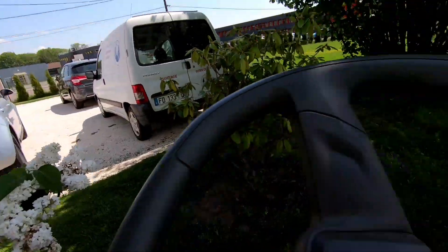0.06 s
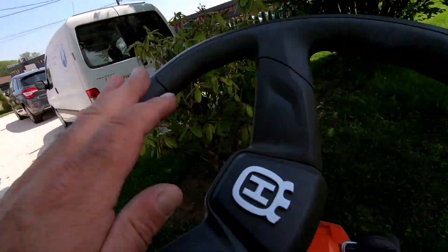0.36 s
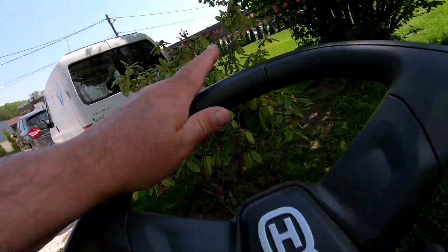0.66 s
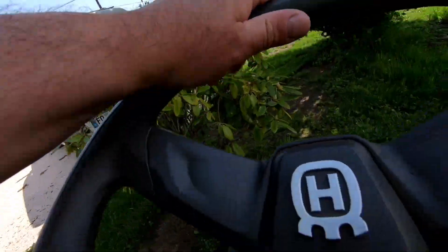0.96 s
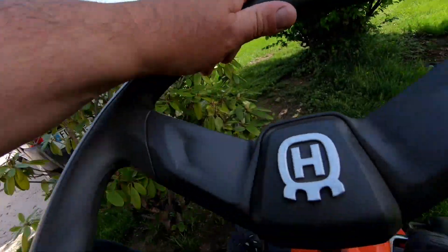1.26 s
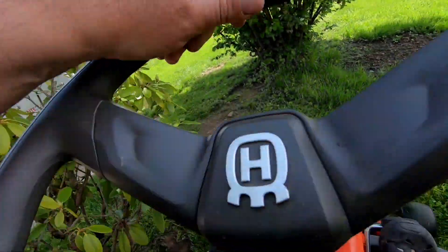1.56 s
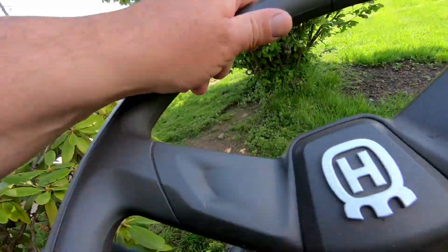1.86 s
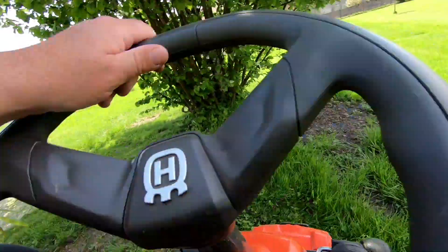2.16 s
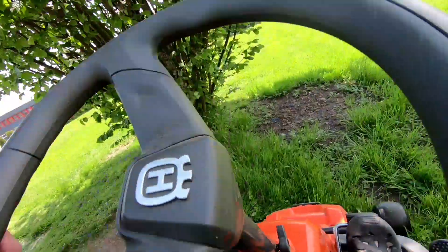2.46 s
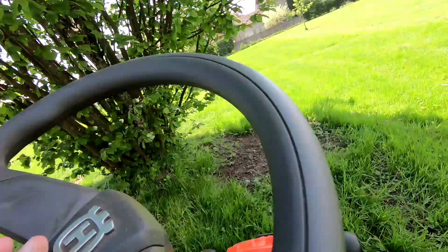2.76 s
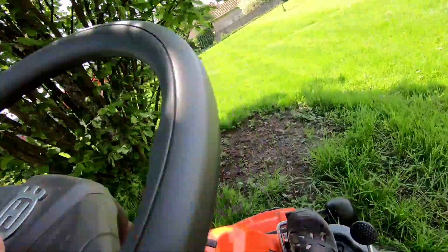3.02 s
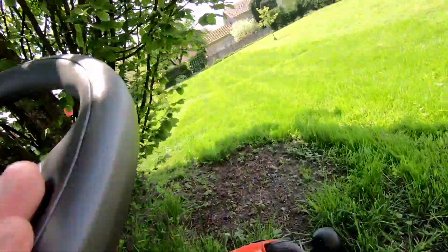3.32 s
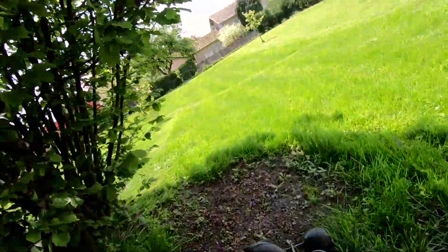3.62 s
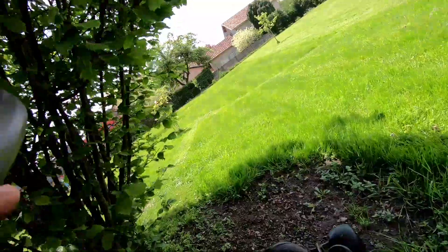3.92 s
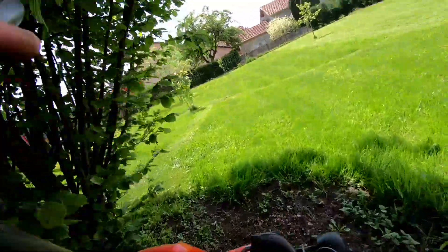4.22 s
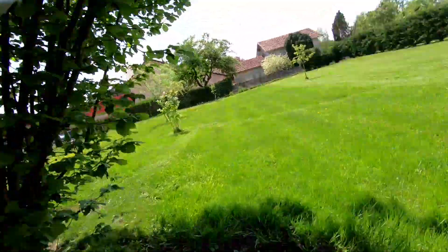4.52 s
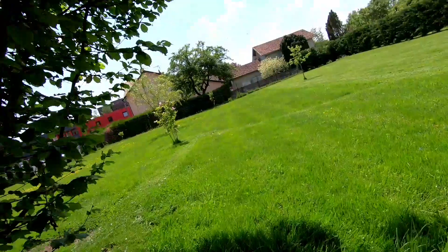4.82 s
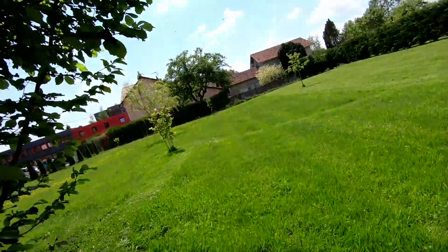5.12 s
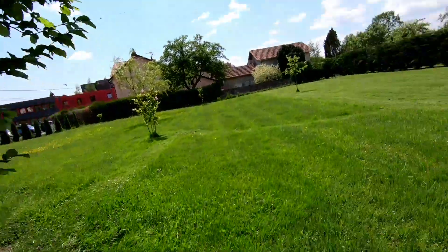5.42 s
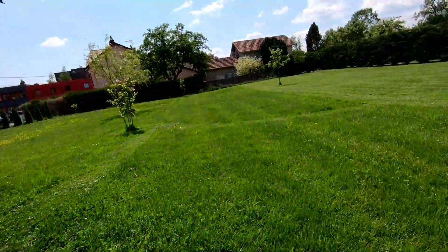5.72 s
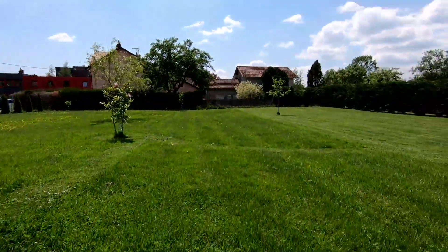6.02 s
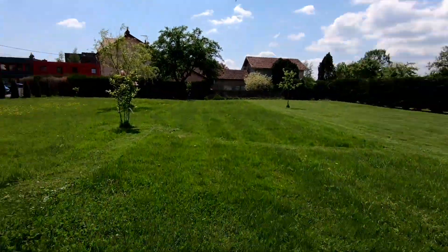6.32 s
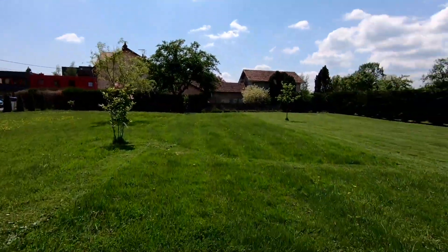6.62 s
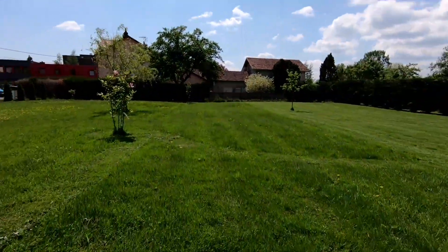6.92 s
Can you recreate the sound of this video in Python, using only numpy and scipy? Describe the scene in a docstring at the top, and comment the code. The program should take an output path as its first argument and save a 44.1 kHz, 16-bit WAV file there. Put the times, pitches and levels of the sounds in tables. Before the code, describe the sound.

A ride-on lawn mower runs steadily, heard close from the driver's seat outdoors. Its engine drone and blade hum throb together over a rush of air and cut grass. At first the machine hisses and squeaks thinly, and loose panels buzz and knock. Midway the grass rush grows heavier while the sound dulls and narrows, then the brightness and width return. A light breeze touches the microphone.

```python
"""Ride-on mower from the driver's seat

A single-cylinder four-stroke drones under a governor; two belt-driven blades hum just below its fifth
order, so the drone throbs. Air and cut grass rush in the deck; the running gear hisses, squeaks and
rings thinly, and loose panels buzz and knock. A light breeze touches the microphones.
Midway the sound narrows to mono and dulls, then opens again."""
import sys
import numpy as np
from scipy import signal
from scipy.fft import rfft, irfft, next_fast_len
from scipy.io import wavfile
from scipy.ndimage import uniform_filter1d

SR = 44100
rng = np.random.default_rng(int(sys.argv[2]) if len(sys.argv) > 2 else 0)


def wav_out(sig):
    """Save sig, one row per channel (or a flat mono array), as 16-bit PCM at SR to the path in sys.argv[1]."""
    wavfile.write(sys.argv[1], SR, np.round(np.clip(np.atleast_2d(sig).T, -1, 1) * 32767).astype(np.int16))


N = 312113
FFT_SIZE = next_fast_len(N, True)
BINS = np.fft.rfftfreq(FFT_SIZE, 1 / SR)


def undb(db):
    """Decibels to gain."""
    return np.exp(np.asarray(db) * (np.log(10) / 20))


def unit(x):
    """Scale to an rms of 1."""
    return x / np.sqrt(np.mean(x ** 2))


def curves(table):
    """Each column of a timed table as an automation curve."""
    times, *columns = np.transpose(table)
    return [np.interp(np.arange(N) / SR, times, column) for column in columns]


def spectrum(table):
    """A table over log frequency, read at every FFT bin."""
    hz, value = np.transpose(table)
    return np.interp(np.log(BINS + 1), np.log(hz), value)


def resonances(table):
    """Gain per FFT bin of a few damped modes."""
    return sum(undb(db) / np.sqrt(width) / (1 + ((BINS - hz) / width) ** 2) for hz, width, db in table)


def drift(rate):
    """Smooth random modulation with an rms of 1 and about rate turns a second."""
    step = max(int(SR / rate / 8), 1)
    coarse = signal.lfilter(np.hanning(9), 1, rng.standard_normal(N // step + 20))[10:]
    return unit(np.interp(np.arange(N) / step, np.arange(len(coarse)), coarse))


def arch(middle_s, length_s):
    """The samples that a swell covers, and its rise and fall."""
    start, end = int((middle_s - length_s / 2) * SR), int((middle_s + length_s / 2) * SR)
    span = np.arange(max(start, 0), min(end, N))
    return span, np.cos(np.pi * (span / SR - middle_s) / length_s)


def swells(table, floor_db):
    """Gain of a bed with smooth swells on top."""
    power = np.full(N, undb(floor_db) ** 2)
    for s, length, db in table:
        span, shape = arch(s, length)
        power[span] += (undb(db) * shape) ** 2
    return np.sqrt(power)


# which microphone the sound reaches first: (frequency [Hz], share of the side leading left [-1 to 1])
MIC_LEAD = [(300, -0.12), (860, -0.72), (1550, 0.69), (2200, 0.41), (3600, 0.31), (4400, 0), (14000, 0)]
# stereo width: (frequency [Hz], side minus mid [dB])
WIDTH = [(30, -3), (100, -7), (250, -26.5), (450, -9), (700, -3.5), (1260, -1), (2300, 2.5), (4300, -2.5),
         (6300, 8), (8000, 5.5), (10000, 3.5), (14500, 1)]
# pan, to the right above the lows: (frequency [Hz], left minus right [dB])
PAN = [(350, 3), (690, -5.5), (1260, -8), (2300, -1.5), (4300, -1.5), (7900, -2), (14000, -1)]
def at_mics(pair, eq=np.ones(len(BINS))):
    """Colour a direct and a diffuse signal and spread them to left and right."""
    mid, diffuse = rfft(pair, FFT_SIZE) * unit(eq)
    lead = np.clip(spectrum(MIC_LEAD), -1, 1)
    side = (1j * lead * mid + np.sqrt(1 - lead ** 2) * diffuse) * undb(spectrum(WIDTH))
    pan = undb(spectrum(PAN) / 2)
    return irfft(np.array([(mid + side) * pan, (mid - side) / pan]), FFT_SIZE)[:, :N]


def pulsed_noise(eq, pulse_db):
    """Stereo noise, modulated by pulse_db and coloured by eq."""
    return at_mics(rng.standard_normal((2, N)) * unit(undb(pulse_db)), eq)


# engine speed: (time [s], firing rate [Hz])
ENGINE_SPEED = [(0, 25.8), (.3, 25.458), (1.29, 25.164), (2.885, 25.242), (3.503, 24.611), (4.126, 24.946),
                (5.125, 25.855), (5.741, 24.926), (6.123, 24.508), (6.9, 24.505), (7.08, 24.795)]
def engine_cycles():
    """Running count of firings as the speed sags and recovers under the governor."""
    return np.cumsum(curves(ENGINE_SPEED)[0]) / SR


# core of the drone: (order [x firing rate], level [dB], gain with load [dB/dB])
MAIN_ORDERS = [(5, -38.5, 0.45), (6, -47, 0.66)]
# the eleventh order swells and fades: (time [s], level [dB])
ELEVENTH_ORDER = [(0, -47.5), (1.4, -44.5), (1.9, -47.5), (2.3, -44.5), (3, -46.5), (3.42, -40.5),
                  (3.72, -42.5), (3.87, -49), (4.05, -45.5), (4.3, -52), (4.7, -46.5), (5.1, -48.5),
                  (5.3, -46), (5.9, -52.5), (6.3, -46.5), (6.65, -43), (7.08, -48)]
# body of the drone: (order [x firing rate], level before trim [dB])
BODY_ORDERS = [(1, -64.5), (2, -51), (3, -53), (4, -63.5), (7, -58.5), (8, -58), (9, -66.5), (10, -53),
               (12, -64), (13, -54.5), (14, -53), (15, -65.5), (16, -60), (18, -63), (20, -66.5), (27, -65),
               (28, -67), (32, -63.5)]
def exhaust(cycle, load_db, jitter_turns=.0017, smear_turns=.04, waver_db=1.45, trim_db=-.5):
    """Harmonics of the firings; the silencer smears each pulse and no two burns are quite alike."""
    uneven = cycle + jitter_turns * drift(11)
    orders = [(k, db + follow * load_db - .23 * drift(.88)) for k, db, follow in MAIN_ORDERS]
    orders += [(11, curves(ELEVENTH_ORDER)[0])]
    orders += [(k, db + trim_db + waver_db * drift(5.7)) for k, db in BODY_ORDERS]
    tones = (undb(db) * np.cos(2 * np.pi * (k * uneven - smear_turns * k * k)) for k, db in orders)
    return np.sqrt(2) * sum(tones)


def rattle(cycle, size=2048, loose_turns=.0009, uneven_db=1.5):
    """Valves, piston and gas repeat the same rattle in each engine cycle, a little loose in time."""
    place = ((cycle + loose_turns * drift(12)) * size).astype(int) % size
    return rng.standard_normal((2, size))[:, place] * undb(uneven_db * drift(40))


# midrange honk of the bonnet: (frequency [Hz], relative level [dB])
BONNET_EQ = [(350, -7.5), (480, -11.5), (700, -1), (950, 7.5), (1250, 9), (1500, -3), (1920, -2),
             (2300, -1), (3200, -11.5), (5000, -35.5)]
def clatter(cycle, rumble_db, trim_db=-10.5):
    """The engine's rattle as it comes through the bonnet."""
    return unit(at_mics(rattle(cycle), undb(spectrum(BONNET_EQ)))) * undb(rumble_db + trim_db)


# first blade's tips passing the deck wall; the belt slips under load: (time [s], pass rate [Hz])
BLADE_SPEED = [(0, 118.3), (.414, 116.57), (1.25, 115.6), (1.7, 115.95), (2.898, 115.74), (3.308, 112.08),
               (4.218, 113.15), (4.78, 116.76), (4.895, 118.62), (5.449, 116.65), (5.931, 111.61),
               (6.19, 111.33), (7.08, 111.53)]
# the second blade creeps ahead and falls back on the belt: (time [s], lead [passes])
BLADE_LEAD = [(0, 0.11), (.12, 0.21), (.45, -0.0057), (.9, .17), (1.12, 0.1), (1.45, 0.18), (1.97, 0.44),
              (2.2, 0.34), (2.4, 0.21), (2.62, 0.18), (3.22, 0.047), (3.42, 0.5), (3.55, 0.33),
              (3.68, 0.16), (3.8, 0.15), (3.94, 0.21), (4.05, 0.32), (4.53, 0.59), (5.07, -0.076),
              (5.23, 0.17), (5.32, 0.0025), (5.6, 0.32), (5.95, 0.31), (6.27, 0.14), (6.43, 0.32),
              (6.63, 0.21), (7.08, 0.47)]
# hum of the first blade: (harmonic [x pass rate], level [dB], gain with load [dB/dB])
BLADE_HUM = [(1, -40.5, 0.3), (2, -39.5, 0.6), (3, -50.5, 0)]
# booms on the third harmonic: (centre [s], length [s], level [dB])
DECK_BOOMS = [(1.3, .6, -45), (3.33, .16, -45.5), (3.92, 0.17, -36.5), (4.13, 0.2, -37), (4.53, .2, -45),
              (4.88, .5, -42.5), (5.56, .2, -42), (6.17, .3, -47)]
# overtones at top speed: (harmonic [x pass rate], level relative to the rumble fader [dB])
BLADE_OVERTONES = [(4, -4.5), (5, -9.5), (6, -16.5), (7, -18.5), (8, -21)]
def blades(rumble_db, load_db, second_db=-3, skew_turns=.13, flutter_db=.4, db_per_hz=.68):
    """Two blades hum; as they drift in and out of step, their harmonics swell and cancel."""
    speed, ahead = curves(BLADE_SPEED)[0], curves(BLADE_LEAD)[0]
    passes = .095 + np.cumsum(speed) / SR
    out = 0
    for k, db, follow in BLADE_HUM:
        # each harmonic leads the one below by about a quarter turn: a steep front, a slow release
        first = k * passes + (k - 1) * (.25 + .028 * drift(4.2))
        second = first + k * ahead + (k - 1) * skew_turns
        pair = np.cos(2 * np.pi * first) + undb(second_db) * np.cos(2 * np.pi * second)
        out += np.sqrt(2) * undb(db + follow * load_db + k * flutter_db * drift(30)) * pair
    out += np.sqrt(2) * np.cos(2 * np.pi * 3 * passes) * swells(DECK_BOOMS, floor_db=-66)
    for k, db in BLADE_OVERTONES:
        # these come off both sides of the deck and reach the microphones unequally
        angle = 2 * np.pi * k * passes
        mid = (1 + .6 * drift(14)) * np.cos(angle) + .6 * drift(14) * np.sin(angle)
        side = .25 * drift(6) * np.sin(angle)
        overtone_db = db + db_per_hz * (speed - speed.max()) + 2 * np.tanh(drift(3))
        out = out + undb(rumble_db + overtone_db) * np.array([mid + side, mid - side])
    return out


# dark bed of moving gas: (frequency [Hz], relative level [dB])
RUMBLE_EQ = [(20, -25), (45, -8.5), (90, -4), (170, -1), (260, 0), (350, -3.5), (480, -9.5), (700, -12.5),
             (1000, -23.5), (2000, -45), (5000, -66)]
def gas_rumble(cycle, rumble_db, load_db, puff_db=1, trim_db=3, churn_db=-56.5):
    """Exhaust gas rumbles, a little stronger at each firing; churning under the deck adds weight."""
    rumble = pulsed_noise(undb(spectrum(RUMBLE_EQ)), puff_db * np.cos(2 * np.pi * cycle))
    return rumble * (undb(rumble_db + trim_db) + undb(churn_db + load_db))


# hollow whoosh of the deck: (frequency [Hz], relative level [dB])
RUSH_EQ = [(200, -22), (550, -1), (800, 5.5), (1050, 1), (1300, -1.5), (1550, -6), (2300, -14.5),
           (4000, -18.5), (6900, -29), (8400, -31.5), (9200, -48), (11400, -52), (12200, -39.5),
           (13200, -48), (15000, -64)]
def grass_rush(load_db, level_db=-54.5, flutter_db=1.3):
    """Air and clippings rush under the deck, louder with load."""
    return pulsed_noise(undb(spectrum(RUSH_EQ)), flutter_db * drift(26)) * undb(level_db + load_db)


# bright hiss and the sizzle on top, each: (frequency [Hz], relative level [dB])
HISS_EQ = [(500, -9.5), (1200, 3), (1950, 5), (2500, 2.5), (3700, 0.2), (4750, -6), (5400, -4), (6500, -5),
           (7100, -11), (8500, -19), (9500, -34.5), (12500, -37), (15000, -41.5)]
SIZZLE_EQ = [(5000, -15), (8000, -1), (9200, 2.5), (10000, 5.5), (10600, 2.5), (11200, -4.5), (12000, -4),
             (13000, -10.5), (13900, -14), (14800, -29.5)]
# treble faders, dipping midway: (time [s], hiss before trim [dB], sizzle before trim [dB])
TREBLE_FADERS = [(0, -59, -76.5), (1.2, -59, -77.5), (1.75, -58, -74), (2.2, -57.5, -76),
                 (3.03, -56.5, -70.5), (3.18, -59, -75.5), (3.36, -62, -83), (3.8, -63.5, -84),
                 (4.25, -66.5, -92), (4.85, -72, -92.5), (5.12, -68.5, -84), (5.24, -66, -79.5),
                 (5.45, -64, -76), (6, -62, -75.5), (6.6, -57, -71), (7.08, -56, -72)]
def running_gear(chatter_db=1.02, grain_db=1, hiss_trim_db=2, sizzle_trim_db=1.5):
    """Fan and belt hiss with a slight chatter; the top is grainy."""
    hiss_db, sizzle_db = curves(TREBLE_FADERS)
    hiss = pulsed_noise(undb(spectrum(HISS_EQ)), chatter_db * drift(30))
    sizzle = pulsed_noise(undb(spectrum(SIZZLE_EQ)), chatter_db * drift(11) + grain_db * drift(600))
    return hiss * undb(hiss_db + hiss_trim_db) + sizzle * undb(sizzle_db + sizzle_trim_db)


# ringing metal of the running gear: (frequency [Hz], width [Hz], relative level [dB])
METAL_MODES = [(4010, 85, 3.5), (4243, 130, 4.5), (5350, 110, -9), (5800, 160, -8)]
# the metal rubs harder: (centre [s], length [s], level [dB])
RUBS = [(.2, .8, -65.5), (1.03, 0.66, -65), (1.65, 1.1, -64.5), (2.13, .4, -66), (2.31, 0.051, -60),
        (2.45, 0.73, -66), (2.95, 0.79, -63.5), (3.6, 1.27, -69.5), (4.97, 0.32, -67), (5.31, .3, -70),
        (5.78, 0.24, -69), (6.16, .14, -71), (6.8, 0.95, -72)]
# the rubbing catches: (centre [s], length [s], pitch [Hz], level [dB])
SQUEAKS = [(0.33, .1, 4050, -63), (.9, .15, 4040, -64), (1.008, 0.12, 4070, -64), (1.13, .15, 4073, -67),
           (1.309, .13, 4050, -64.5), (1.471, .08, 4170, -64), (1.74, .15, 4040, -62.5),
           (1.93, .07, 4130, -67), (2.09, .12, 4030, -61), (2.201, .1, 4010, -59),
           (2.305, 0.045, 4000, -56.5), (2.509, 0.1, 4050, -62), (2.626, 0.16, 4000, -63),
           (2.72, .15, 3960, -61), (2.82, 0.036, 4220, -60), (2.892, .035, 4130, -58),
           (4.68, 0.18, 4110, -70.5), (4.928, .14, 4100, -68), (5.404, .1, 4080, -66),
           (6.477, 0.22, 4080, -68), (6.732, .2, 4130, -64), (6.972, .24, 4110, -63.5)]
def rubbing_metal(scrape_db=1.5, waver_hz=22, chatter_db=3, kick_db=-5):
    """Uneven rubbing keeps thin metal ringing; where it catches, it squeaks and kicks the ring."""
    ring = pulsed_noise(resonances(METAL_MODES), scrape_db * drift(40))
    pitch = curves([(s, hz) for s, _, hz, _ in SQUEAKS])[0] + waver_hz * drift(40)
    tone = np.sin(2 * np.pi * np.cumsum(pitch) / SR)
    squeak = unit(tone * undb(chatter_db * np.tanh(drift(150))))
    catching = swells([(s, length, db) for s, length, _, db in SQUEAKS], floor_db=-74)
    hiss_db = curves(TREBLE_FADERS)[0]
    rubbing = swells(RUBS, floor_db=-70 + .5 * (hiss_db - hiss_db.mean()))
    return ring * np.hypot(rubbing, catching * undb(kick_db)) + squeak * catching


# two high rings: (time [s], lower pitch [Hz], its level [dB], upper pitch [Hz], its level [dB])
WHINES = [(0, 5840, -71, 6750, -81), (.3, 5960, -70, 6750, -78), (.6, 5820, -70, 6700, -77.5),
          (1.25, 5790, -67.5, 6680, -74), (1.95, 5790, -68, 6690, -72), (2.2, 5790, -75, 6700, -78),
          (2.65, 5800, -70, 6700, -78), (2.98, 5790, -71.5, 6600, -83), (3.45, 5770, -84, 6600, -83),
          (4.7, 5830, -78, 6740, -81.5), (5.4, 5800, -82.5, 6680, -83), (5.9, 5650, -78, 6540, -81),
          (6.55, 5780, -80, 6480, -72), (7.08, 5950, -77, 6490, -72)]
def whines(width_hz=140, shimmer_db=2.5):
    """Two metallic rings of the running gear drift in pitch and shimmer."""
    low_hz, low_db, high_hz, high_db = curves(WHINES)
    out = 0
    for hz, db in (low_hz, low_db), (high_hz, high_db):
        angle = 2 * np.pi * np.cumsum(hz) / SR
        cos, sin = np.cos(angle), np.sin(angle)
        ring = np.array([drift(width_hz) * cos + drift(width_hz) * sin for _ in range(2)])
        out += unit(ring * undb(shimmer_db * np.tanh(drift(40)))) * undb(db)
    return at_mics(out)


# thin top partials: (frequency [Hz], width [Hz], relative level [dB])
JINGLE_MODES = [(8776, 35, -1), (9476, 40, 0)]
# their swells: (centre [s], length [s], level [dB])
JINGLES = [(.5, .9, -84), (1.45, .9, -79), (2.45, 1.1, -80.5)]
def jingle(shimmer_db=3):
    """Two thin partials jingle faintly above the whines."""
    partials = pulsed_noise(resonances(JINGLE_MODES), shimmer_db * np.tanh(drift(16)))
    return partials * swells(JINGLES, floor_db=-98)


# soft, low wind noise: (frequency [Hz], relative level [dB])
BREEZE_EQ = [(15, -22), (45, -0.5), (75, 3), (130, 1), (270, -1.5), (450, -5.5), (900, -10.5), (2000, -38),
             (8000, -91)]
# gusts: (centre [s], length [s], level [dB])
GUSTS = [(.35, 0.46, -48), (2.92, 0.61, -38.5), (6.97, 0.67, -42.5)]
def breeze(flutter_db=3):
    """A faint flutter of air pushes the two microphones in opposite ways."""
    air = irfft(rfft(rng.standard_normal(N), FFT_SIZE) * undb(spectrum(BREEZE_EQ)), FFT_SIZE)[:N]
    flutter = unit(air * undb(flutter_db * np.tanh(drift(12)))) * swells(GUSTS, floor_db=-54.5)
    return np.array([flutter, -flutter])


# fits of buzzing: (centre [s], length [s], pitch [Hz], width [Hz], level [dB])
BUZZES = [(.33, 0.5, 1230, 35, -66), (.92, .35, 1840, 250, -66), (1.1, 2.8, 1970, 260, -64),
          (1.85, .07, 2850, 800, -57), (2.414, 0.55, 1170, 352, -58), (3.83, 0.41, 1080, 497, -54.5),
          (4.8, 1.13, 1255, 400, -56.5), (5.401, 0.8, 1370, 220, -61), (5.546, 0.59, 2400, 500, -64),
          (6.65, 1, 2340, 402, -64), (6.755, 1.58, 846, 170, -55.5)]
def panel_buzz(cycle, noise_db=-3, flutter_db=1.5):
    """The engine shakes loose panels, each buzzing at its own resonance."""
    shake = rattle(cycle) + undb(noise_db) * rng.standard_normal((2, N))
    shake *= undb(flutter_db * drift(50))
    out = np.zeros((2, N))
    for s, length, hz, width, db in BUZZES:
        span, shape = arch(s, length)
        out[:, span] += unit(panel_ring(shake[:, span], hz, width)) * shape * undb(db)
    return out


def panel_ring(drive, hz, width_hz):
    """A panel's resonance: two passes through one peak filter."""
    b, a = signal.iirpeak(hz, hz / width_hz, fs=SR)
    return signal.lfilter(b, a, signal.lfilter(b, a, drive))


# two runs of knocks, about one a firing: (time [s], pitch [Hz], level [dB])
KNOCKS = [(.78, 1820, -55), (.877, 1850, -57), (.898, 1850, -54), (.942, 1820, -54), (.978, 1820, -56),
          (1.816, 2030, -54), (1.89, 1930, -52), (1.931, 1940, -53), (1.97, 1980, -50.5),
          (2.013, 1970, -51)]
def panel_knocks(rise_s=.003, width_hz=220):
    """Each knock is a short, rough burst in a loose panel's resonance."""
    out = np.zeros((2, N))
    length = int(12 * rise_s * SR)
    age = np.arange(length) / (rise_s * SR)
    envelope = age * np.exp(1 - age)
    envelope_rms = np.sqrt(np.mean(envelope ** 2))
    for s, hz, db in KNOCKS:
        ring = panel_ring(rng.standard_normal((2, 2 * length)), hz, width_hz)[:, length:]
        out[:, int(s * SR) + np.arange(length)] += unit(ring * envelope) * envelope_rms * undb(db)
    return out


# load of grass on the deck: (time [s], relative level [dB])
DECK_LOAD = [(0, -0.5), (1.7, -2.5), (2.8, -0.5), (3.25, -1.5), (3.85, 4.5), (4.1, 5), (4.24, 3), (4.4, 5),
             (4.8, 6.5), (5.05, 4.5), (5.4, 4), (6, 2), (7.08, -2)]
# shared fader for rumble, clatter and blade overtones: (time [s], level [dB])
RUMBLE_FADER = [(0, -45.5), (1.1, -47), (1.8, -44), (3.05, -47), (3.4, -44), (4.2, -45), (5.7, -49),
                (6.4, -47.5), (7.08, -45.5)]
def scene():
    """The low tones sit in the centre; the noise surrounds them."""
    cycle = engine_cycles()
    load_db, rumble_db = curves(DECK_LOAD)[0], curves(RUMBLE_FADER)[0]
    engine = exhaust(cycle, load_db) + clatter(cycle, rumble_db)
    gear = running_gear() + rubbing_metal() + whines() + jingle()
    panels = at_mics(panel_buzz(cycle) + panel_knocks())
    hum = blades(rumble_db, load_db)
    air = gas_rumble(cycle, rumble_db, load_db) + grass_rush(load_db) + breeze()
    return engine + gear + panels + hum + air


def bass_limiter(pair, threshold_db=-31, window_s=.017, makeup_db=.08, bass_hz=420):
    """The bass ducks on the loudest throbs of the drone."""
    bass = signal.sosfiltfilt(signal.butter(2, bass_hz, fs=SR, output="sos"), pair)
    power = uniform_filter1d(bass.mean(axis=0) ** 2, int(window_s * SR))
    over = np.maximum(np.sqrt(np.abs(power)) / undb(threshold_db), 1)
    return pair - bass + bass * undb(makeup_db) / over


# dip to mono, lows then highs: (starts closing [s], closed [s], starts opening [s], open [s], dip [dB])
MONO_DIP = [(3.09, 3.722, 5.05, 6.46, -58), (3.118, 3.978, 4.6, 5.37, -34)]
def record(dry, split_hz=900, side_db=-3.5, top_hz=14700):
    """Bass peaks are evened out; the image narrows for a while, most in the lows; the top is cut."""
    left, right = bass_limiter(dry)
    mid, side = (left + right) / 2, (left - right) / 2
    t = np.arange(N) / SR
    lows_db, highs_db = (side_db + np.interp(t, times, [0, db, db, 0]) for *times, db in MONO_DIP)
    lows = signal.sosfiltfilt(signal.butter(2, split_hz, fs=SR, output="sos"), side)
    side = lows * undb(lows_db) + (side - lows) * undb(highs_db)
    high_cut = signal.ellip(8, .2, 70, top_hz, fs=SR, output="sos")
    return signal.sosfilt(high_cut, [mid + side, mid - side])


dry = scene()
out = record(dry)
wav_out(out)
```